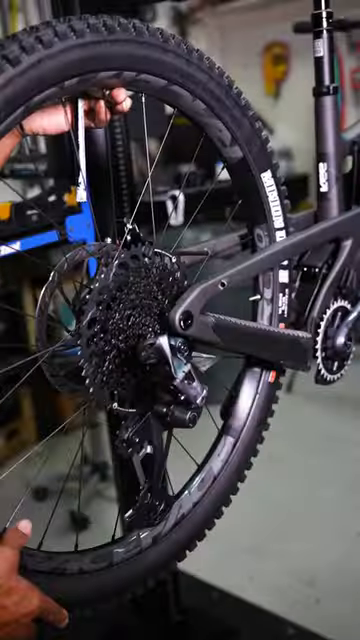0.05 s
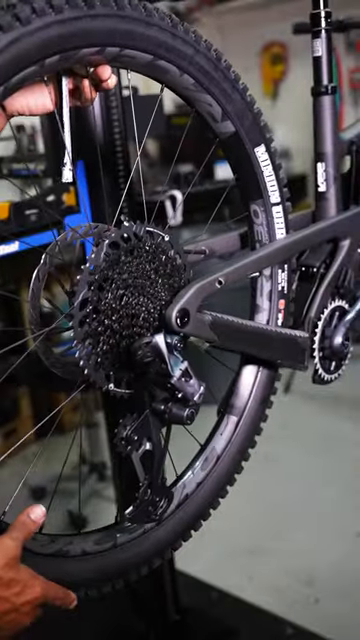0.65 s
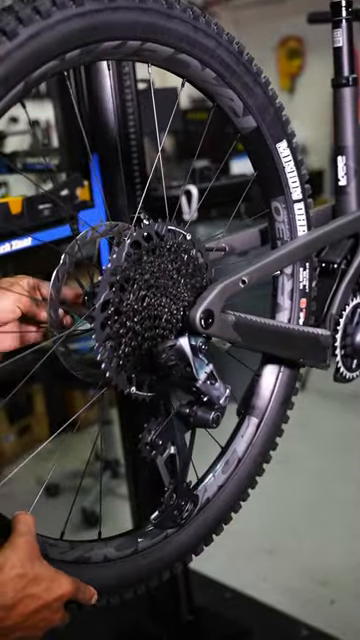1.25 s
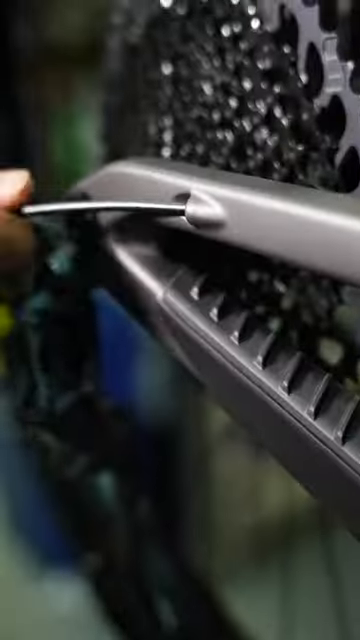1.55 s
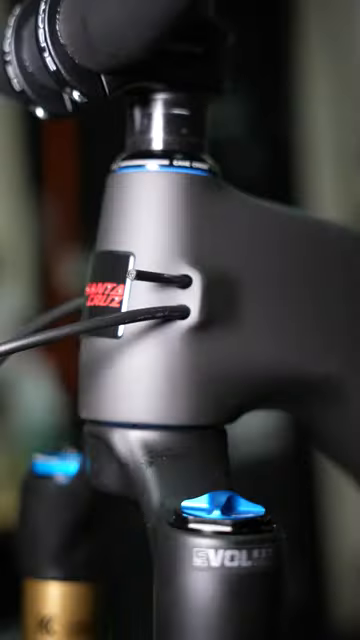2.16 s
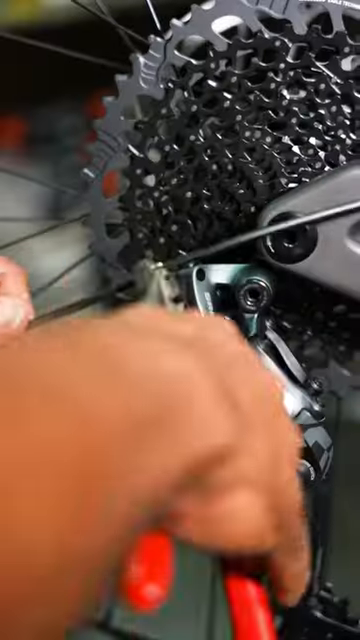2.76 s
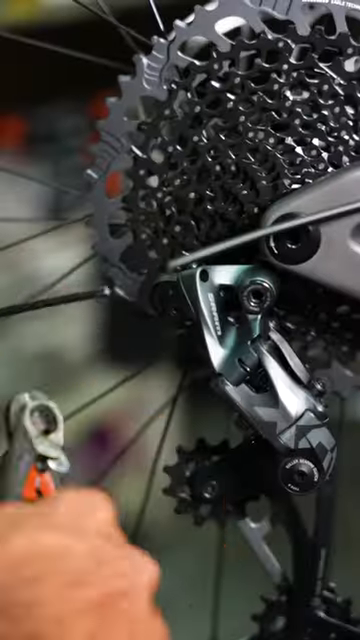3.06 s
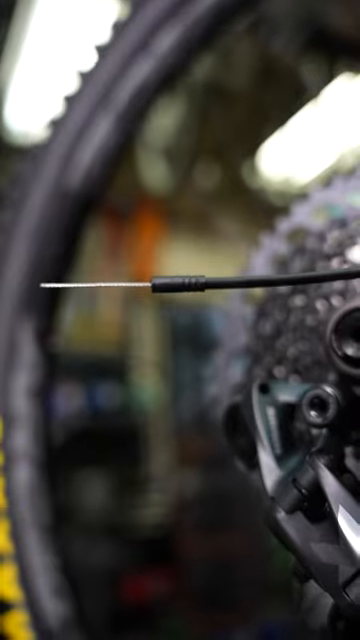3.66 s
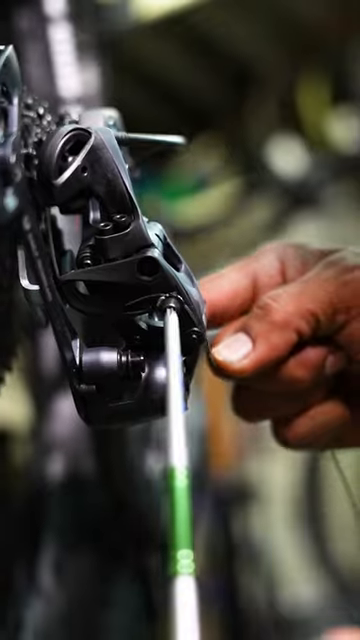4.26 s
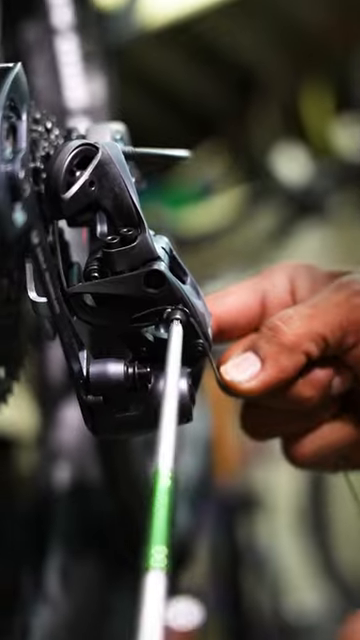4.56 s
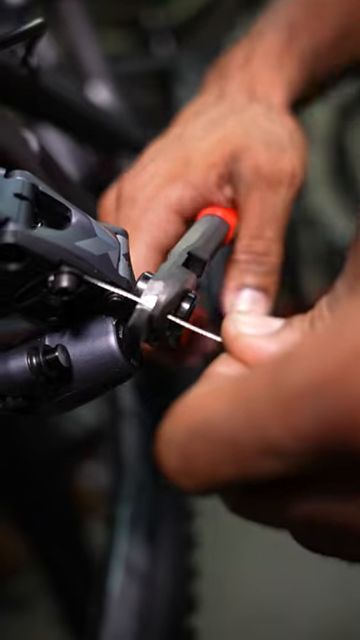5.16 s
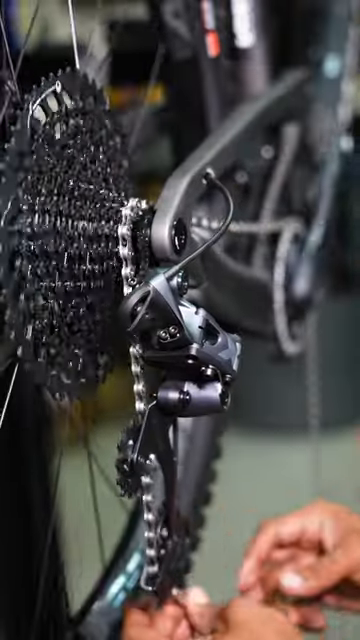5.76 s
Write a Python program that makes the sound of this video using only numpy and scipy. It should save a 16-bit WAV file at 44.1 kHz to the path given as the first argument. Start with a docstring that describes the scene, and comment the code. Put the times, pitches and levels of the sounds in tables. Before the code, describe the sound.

A bicycle wheel thuds into its frame, an axle zips and knocks home, then cutters snap twice through cable in a quiet workshop.

```python
"""A tyre drags briefly and a bicycle's rear wheel thuds into its frame, close by in a quiet workshop.
The axle slides in, its grooves zipping higher as it gains speed, and knocks home. Cable housing swishes
through the frame, a hex key scrapes, cutters snap through the housing, a tool ticks, the inner wire is
cut, and the chain starts to run. Impacts excite the damped modes of the parts and the room's echoes;
sliding friction is a train of tiny slips, filtered by the part that rubs."""
import sys
import numpy as np
from scipy import signal
from scipy.fft import rfft, irfft
from scipy.io import wavfile
from scipy.ndimage import uniform_filter1d

SR = 44100
rng = np.random.default_rng(int(sys.argv[2]) if len(sys.argv) > 2 else 0)


def unload_audio(sound):
    """Save the sound as a 16-bit wav file, at the path given as the first command line argument."""
    columns = np.transpose(np.atleast_2d(sound))
    # keep every value between -1 and 1, then stretch to whole-number steps
    steps = np.round(np.clip(columns, -1, 1) * 32767)
    wavfile.write(sys.argv[1], SR, steps.astype(np.int16))


N = 265041
TIME = np.arange(N) / SR
STRAND_MS = 1.8  # decay time of a strand's crack


def amp(db):
    """Amplitude ratio of a level in decibels."""
    return 10 ** (np.asarray(db) / 20)


def unit(x):
    """Normalisation to rms 1."""
    return x / np.sqrt(np.mean(x ** 2) + 1e-20)


def add(mix, s, sound):
    """Superposition: a sound joins the mix at time s."""
    part = mix[max(round(s * SR), 0):][:len(sound)]
    part += sound[:len(part)]


def flutter(samples, shape=N):
    """Random fluctuation: a moving average of white noise, rms 1."""
    return unit(uniform_filter1d(rng.standard_normal(shape), size=samples))


def envelope(strokes, attack_s, release_s, sag_db=0):
    """Amplitude envelope: each stroke rises 20 dB, sags steadily, then drops 20 dB per release time."""
    gain = np.zeros(N)
    for s, length_s, db in strokes:
        t = TIME - s
        ramps = np.maximum(1 - t / attack_s, 0) + np.maximum(t - length_s, 0) / release_s
        gain += (t >= 0) * amp(db - sag_db * np.clip(t / length_s, 0, 1) - 20 * np.minimum(ramps, 10))
    return gain


def colour(x, spectrum, tilt=0, size=4096):
    """Minimum-phase filtering to a spectral shape, tilted in dB per octave above 255 Hz."""
    octave = np.log2(abs(np.fft.fftfreq(size, 1 / SR)) + 1)
    hz, db = np.transpose(spectrum)
    db = np.interp(octave, np.log2(hz + 1), db) + tilt * np.maximum(octave - 8, 0)
    log_gain = np.log(amp(np.maximum(db - db.max(), -90)))
    taps = np.fft.ifft(np.exp(np.conj(signal.hilbert(log_gain)))).real
    return signal.fftconvolve(x, taps[:size // 2])


def resonate(x, hz, width_hz):
    """Resonance of gain 1 whose centre frequency may move."""
    carrier = np.exp(2j * np.pi * np.cumsum(hz * np.ones(N)) / SR)
    pole = np.exp(-np.pi * width_hz / SR)
    return 2 * (carrier * signal.lfilter([1 - pole], [1, -pole], x / carrier)).real


def glide(hz, width_hz):
    """Forced resonance: friction noise in a band that can follow a moving pitch, rms 1."""
    return unit(resonate(resonate(rng.standard_normal(N), hz, width_hz), hz, 2 * width_hz))


def sing(resonances):
    """Random excitation: friction keeps narrow resonances sounding, each flickering by itself."""
    return sum(amp(db) * unit(resonate(resonate(rng.standard_normal(N), hz, width), hz, width))
               for hz, width, db in resonances)


def body(x, share, length_s=.014, count=10):
    """Comb filtering: waves reflected to and fro inside a part give it many close resonances."""
    taps = np.zeros(int(length_s * SR))
    echoes = rng.choice([-1, 1], count) * share / np.sqrt(count)
    taps[rng.integers(len(taps) // 5, len(taps), count)] = echoes
    taps[0] = 1
    return signal.fftconvolve(x, taps / np.linalg.norm(taps))[:N]


def room(t60, build_s=0.0038, fade_s=.31, treble_hz=10000, treble_life=0.92):
    """Reverberation of energy 1: uneven early echoes merge into a tail whose treble dies sooner."""
    t = np.arange(SR * 3 // 5) / SR
    echoes = rng.standard_normal(len(t)) * amp(4.4 * rng.standard_normal(len(t)) * np.exp(-t / 0.066))
    dull = signal.sosfiltfilt(signal.butter(2, treble_hz, fs=SR, output="sos"), echoes)
    tail = dull * amp(-60 * t / t60) + (echoes - dull) * amp(-60 * t / (t60 * treble_life))
    tail *= (1 - np.exp(-(t / build_s) ** 2)) * np.exp(-(t / fade_s) ** 4)
    return tail / np.linalg.norm(tail)


def contact(decay_ms, passes=4):
    """Broadband excitation: a quickly dying burst of tiny impacts with a nearly flat spectrum."""
    fade = np.exp(-np.arange(int(decay_ms * SR / 150) + 16) * 1000 / SR / decay_ms)
    burst = rng.standard_normal(len(fade)) * fade
    for _ in range(passes):
        flat = unit(irfft(np.exp(1j * np.angle(rfft(burst))), len(fade)))
        burst = np.clip(flat * np.sqrt(np.mean(fade ** 2)), -2 * fade, 2 * fade)
    return burst


def struck(blows, direct, reverberant, room_db, t60, fade_s, build_s=0.0068, bright_db=0, soften_db=0):
    """Impact: a direct crack and its reverberant tail; soften_db makes longer contacts duller."""
    cracks, tails = np.zeros((2, N))
    for s, db, decay_ms in blows:
        decay_ms = max(decay_ms, .2)
        tilt = bright_db - soften_db * np.log2(decay_ms)  # dB per octave
        strength = amp(db) * np.sqrt(decay_ms * SR / 2000)
        crack = colour(contact(decay_ms), direct, tilt)
        tail = colour(room(t60, build_s, fade_s), reverberant, tilt / 2)
        add(cracks, s, strength * crack / np.linalg.norm(crack))
        add(tails, s, strength * amp(room_db) * tail / np.linalg.norm(tail))
    return cracks + body(tails, share=0.55)


def ring(s, modes, db, rise_s, blur_hz, length_s=0.56):
    """Free vibration: struck modes decay, each wavering as eight echo paths interfere."""
    t, out = np.arange(0, length_s, 1 / SR), np.zeros(N)
    for hz, level_db, t60 in modes:
        path_hz = hz + blur_hz * rng.uniform(-1, 1, (8, 1))
        paths = np.cos(2 * np.pi * (path_hz * t + rng.random((8, 1)))).sum(0)
        fade = amp(-60 * t / t60) * (1 - np.exp(-t / rise_s)) * np.cos(np.pi / 2 * t / t[-1]) ** 2
        add(out, s, amp(db + level_db) * unit(paths * fade) * np.sqrt(np.mean(fade ** 2) / 2))
    return out


def rub(pressure, spectrum, grain_db, wet):
    """Sliding friction: a dense train of uneven slips, scaled by the pressure of the stroke."""
    slips = rng.standard_normal(N) * amp(grain_db * flutter(40))
    direct = unit(colour(slips, spectrum)[:N]) * pressure
    return direct + wet * signal.fftconvolve(direct, room(t60=0.27))[:N]


def air():
    """Noise floor: steady room noise, three low swells and the pure tones of electric hum."""
    # Noise spectra and hum lines (frequency [Hz], relative level [dB])
    floor_spectrum = [(15, -31.5), (25, -6.5), (117, -2.5), (149, -5), (195, -6.5), (373, -11), (560, -12),
                      (818, -17.5), (1890, -19), (5880, -36.5), (16000, -58)]
    swell_spectrum = [(50, -8.5), (170, 1), (330, -4.5), (700, -16.5), (3000, -24.5), (12000, -55)]
    hum_lines = [(119.5, -79.5), (177.6, -75), (403.7, -83.5), (549, -82), (919.5, -84), (1470, -90),
                 (3273, -90)]
    # Swells (start [s], length [s], level [dB])
    swell_spans = [(1.55, 0.397, -67), (3.45, 0.669, -68.5), (5.75, 0.3, -68)]
    hum = sum(amp(db) * np.sqrt(2) * np.sin(2 * np.pi * (hz * TIME + rng.random()))
              for hz, db in hum_lines)
    swells = unit(colour(rng.standard_normal(N), swell_spectrum)[:N])
    swells *= envelope(swell_spans, attack_s=0.011, release_s=.12)
    floor = unit(colour(rng.standard_normal(N), floor_spectrum)[:N])
    return amp(-70) * floor + swells + amp(-5) * hum


def chain():
    """Forced vibration: rollers fizz and the sprockets ring faintly, louder as the chain speeds up."""
    # The chain's run (start [s], length [s], relative level [dB])
    run = [(5.749, .26, -46.5)]
    # Roller noise (frequency [Hz], level [dB])
    spectrum = [(240, -34), (400, -12), (1160, -18), (2250, -4), (2550, -13), (2800, -10.5), (3580, -10.5),
                (5870, -0.5), (9920, -2.5), (16000, -3.5)]
    # Sprocket resonances (frequency [Hz], bandwidth [Hz], level [dB])
    resonances = [(2235, 180, 0), (2783, 71, -5.5), (4170, 250, -4), (5940, 230, -3)]
    pressure = envelope(run, attack_s=0.0067, release_s=.05, sag_db=-4.5)
    rollers = rub(pressure, spectrum, grain_db=3, wet=0.11)
    sprockets = sing(resonances) * envelope(run, attack_s=0.0208, release_s=.05, sag_db=-8.5)
    return amp(-0.9) * rollers + amp(-16.5) * sprockets


def hex_key():
    """Impact and friction: a hex key slips into the shifter's bolt, rings, scrapes and turns."""
    # Scrapes (time [s], level [dB], decay [ms])
    scrapes = [(2.202, -72, 14), (2.386, -66.5, 6), (2.515, -70.5, 16)]
    # Turns (start [s], length [s], level [dB])
    turns = [(2.34, 0.075, -70), (2.53, 0.15, -75)]
    # Their spectra (frequency [Hz], level [dB])
    scrape_spectrum = [(500, -10), (1870, -3.5), (3500, -1), (5500, -10), (6960, -18), (8800, -9),
                       (12000, -26), (15600, -55)]
    turn_spectrum = [(300, -25), (430, -1), (640, 2), (950, -6), (1200, -17), (3200, -19), (4500, -19),
                     (7000, -35)]
    # Modes of the key (frequency [Hz], level [dB], t60 [s])
    modes = [(1900, 3, 0.178), (3000, 0, 0.1505), (4300, -7, 0.1)]
    key = struck(scrapes, scrape_spectrum, scrape_spectrum, room_db=-3, t60=0.23, fade_s=.1)
    key += ring(2.202, modes, db=-64.5, rise_s=0.002, blur_hz=450, length_s=0.1505)
    return key + rub(envelope(turns, attack_s=0.018, release_s=0.053), turn_spectrum, grain_db=3, wet=.1)


def adjusting():
    """Light impacts: a tool ticks brightly on the derailleur's screws, and a lever knocks softly."""
    # Contacts (time [s], level [dB], decay [ms])
    tool_ticks = [(4.1838, -29, 1.74), (4.2129, -27, 1.14), (4.859, -59.5, 3.8)]
    lever_knocks = [(4.76, -51.5, 13.2)]
    # Their spectra (frequency [Hz], level [dB])
    tool_direct = [(880, -56), (1500, -21.5), (2540, -0.5), (3450, -23.5), (4370, 0.5), (8400, 1.5),
                   (16000, 0)]
    tool_reverb = [(880, -36.5), (1500, -5.5), (2460, -2), (3550, -10), (4420, -1), (13800, -9),
                   (16000, 0.5)]
    lever_spectrum = [(110, -40), (180, -28), (280, 4), (337, -46), (547, -17.5), (611, -22), (1170, -3.5),
                      (1520, -14), (1570, -33), (2500, -29), (4000, -100)]
    ticks = struck(tool_ticks, tool_direct, tool_reverb, room_db=-13, t60=0.18, fade_s=0.087,
                   bright_db=2, soften_db=0.5)
    return ticks + struck(lever_knocks, lever_spectrum, lever_spectrum, room_db=0, t60=0.2, fade_s=0.098)


def cables():
    """Friction in a tube: housing swishes in and taps out of its port; the wire clicks past the cap."""
    # Slides (start [s], length [s], level [dB])
    feed_in = [(1.549, 0.13, -37.5)]
    feed_out = [(1.908, 0.091, -44)]
    wire_slides = [(3.608, 0.0877, -65), (3.908, 0.0712, -63)]
    # Contacts of the housing (time [s], level [dB], decay [ms])
    feed_catches = [(1.546, -45, 2.1), (1.576, -30, 5), (1.912, -54, 6.6)]
    port_taps = [(1.981, -43, 7.37), (1.9848, -25.5, 1.11), (1.999, -26, 1.95), (2.052, -43.5, 2.6)]
    # Spectra of the slides and contacts (frequency [Hz], level [dB])
    in_spectrum = [(530, -61), (900, -24), (1410, -26), (1490, -22), (2070, 1.5), (2730, 2.5), (3770, -0.5),
                   (4800, 1), (6480, -1), (8250, -7.5), (13500, -12), (16000, -18.5)]
    out_spectrum = [(530, -63), (900, -19), (1100, -25), (2270, -5.5), (3500, -3.5), (9310, -13.5),
                    (16000, -33.5)]
    wire_spectrum = [(650, -41), (1100, -5), (1420, -13), (1830, 0), (3360, -15), (4920, -7), (6440, -20),
                     (13000, -32)]
    port_spectrum = [(180, -54), (300, -18), (360, -10), (701, -11), (1120, -15), (1230, -5), (1810, -8.5),
                     (2100, 7.5), (2520, -13.5), (3350, -7), (5340, -16), (7570, -16), (16000, -58.5)]
    # Modes of the frame's port and the housing's end cap (frequency [Hz], level [dB], t60 [s])
    port_modes = [(1279, -2.5, 0.16), (2086, -2, 0.125), (3380, 5, 0.087), (7400, -8, 0.12)]
    cap_modes = [(1790, 0, 0.11)]
    push = envelope(feed_in, attack_s=0.02, release_s=0.035, sag_db=8)
    pull = envelope(feed_out, attack_s=0.03, release_s=0.0552, sag_db=0.5)
    feed = rub(push, in_spectrum, grain_db=1.5, wet=0.0764)
    feed += rub(pull, out_spectrum, grain_db=0, wet=.15)
    catches = struck(feed_catches, in_spectrum, in_spectrum, room_db=-1.5, t60=0.29, fade_s=.1,
                     bright_db=8, soften_db=4)
    threading = envelope(wire_slides, attack_s=.013, release_s=0.048, sag_db=1)
    wire = rub(threading, wire_spectrum, grain_db=0, wet=0.18)
    cap = ring(3.917, cap_modes, db=-50.5, rise_s=0.00083, blur_hz=90.5)
    taps = struck(port_taps, port_spectrum, port_spectrum, room_db=-4, t60=0.191, fade_s=0.099,
                  bright_db=7.5, soften_db=4)
    swish = body(feed, share=0.28)
    port = ring(1.999, port_modes, db=-40, rise_s=0.00085, blur_hz=69.5)
    return swish + catches + wire + cap + taps + port


def wheel():
    """Friction, then impact: the tyre drags, the hub drops in, and the wheel rings and rocks twice."""
    # Slides (start [s], length [s], level [dB])
    tyre_drag = [(0, 0.047, -43.5)]
    hub_seating = [(.25, .08, -57)]
    dropout_graze = [(.303, 0.01505, -36.5)]
    # Impacts (time [s], level [dB], decay [ms])
    drop_blows = [(.3038, -34.5, 4.1), (.318, -28.5, 23), (.3312, -18.5, 6.1), (.3342, -4.5, 3.5),
                  (.3455, -7, 2.6), (.3475, -8, 3.7), (.3715, -20, 6.7), (.402, -29, .4),
                  (.4595, -33.5, 0.39), (.5285, -40.5, 0.84)]
    dull_bumps = [(.303, -39, 15), (.443, -30.5, 15), (.679, -45, 4.34), (.697, -45.5, 18),
                  (5.788, -55, 7.8)]  # four as the wheel settles, one as the chain starts to run
    # Spectra of the slides and impacts (frequency [Hz], level [dB])
    drag_spectrum = [(59, -29), (100, -13), (243, -14.5), (400, 4.5), (576, -15), (686, -23.5),
                     (1400, -27.5), (1740, -13.5), (2180, -38), (3250, -48)]
    seating_spectrum = [(290, -45), (500, -15), (839, -0.5), (1040, -20), (1450, -8), (2240, -30),
                        (5740, -22.5), (7000, -45)]
    drop_direct = [(29, -39), (60, -14), (155, -6.5), (507, -14), (646, -7.5), (1020, -17), (1300, -5),
                   (1540, -13.5), (1700, 0), (2210, -15), (2620, 1), (3100, -16), (4350, 2.5), (4900, -18),
                   (16000, -41)]
    drop_reverb = [(24, -49), (40, -24), (185, -6.5), (412, -7), (542, -9.5), (680, -6), (831, -12),
                   (942, -7.5), (1150, -13), (1340, -9.5), (2050, -5.5), (3060, -11.5), (4460, -15.5),
                   (11800, -36.5), (16000, -42)]
    bump_spectrum = [(71, -53), (120, -23.5), (234, -32), (314, -3), (418, 4), (510, -19), (637, -9.5),
                     (731, -22), (1500, -51.5), (3300, -120)]
    # Rocking against the frame (time [s], level [dB], tilt about 400 Hz [dB/octave], length [s])
    rocks = [(0.443, -30, 2, 0.27), (0.68, -46.5, -5, 0.17)]
    # Modes of the wheel (frequency [Hz], level [dB], t60 [s])
    rim_modes = [(85.8, -4.5, 0.11), (167.15, -4, 0.29), (205, -1, .16), (1354, -2, .2), (1793.2, -4.5, .2),
                 (2676, -2, 0.29), (4470, 1, .17)]
    rock_modes = [(164.5, -22.5, 0.61), (339.4, 2.5, 0.29), (394.4, 3.5, 0.19), (431.6, -3.5, 0.73),
                  (620, -1, 0.18), (838, -2.5, 0.16)]
    tyre_pressure = envelope(tyre_drag, attack_s=0.00065, release_s=0.0049, sag_db=7)
    drag = rub(tyre_pressure, drag_spectrum, grain_db=0, wet=0.045)
    hub_pressure = envelope(hub_seating, attack_s=.002, release_s=.01, sag_db=-6.5)
    seating = rub(hub_pressure, seating_spectrum, grain_db=1.5, wet=.1)
    drop = struck(drop_blows, drop_direct, drop_reverb, room_db=-2, t60=0.46, fade_s=0.25,
                  build_s=0.0034, bright_db=3.5, soften_db=2)
    rim = ring(.333, rim_modes, db=-19, rise_s=.003, blur_hz=8)
    bumps = struck(dull_bumps, bump_spectrum, bump_spectrum, room_db=-1, t60=0.29, fade_s=0.23,
                   bright_db=10.5, soften_db=2.5)
    for s, db, tilt, length_s in rocks:
        modes = [(hz, level_db + tilt * np.log2(hz / 400), t60) for hz, level_db, t60 in rock_modes]
        bumps += ring(s, modes, db, rise_s=0.0051, blur_hz=4.8, length_s=length_s)
    graze = glide(4707, width_hz=1306)
    graze *= envelope(dropout_graze, attack_s=0.0031, release_s=.03, sag_db=6.5)
    return drag + seating + graze + drop + rim + bumps


def grooves(pitch, jitter_hz=224, burst_db=2.5, octave_db=-8):
    """Periodic excitation: grooves pass at an unsteady rate, sounding a tone and its octave in bursts."""
    # Noise bands from uneven grooves (multiple of the pitch, bandwidth [Hz], level [dB])
    bands = [(.72, 594, -9.5), (1.4, 903, -7), (2.2, 3002, -10)]
    phase = 2 * np.pi * np.cumsum(pitch + jitter_hz * flutter(24)) / SR
    bursts = amp(burst_db * flutter(200, (2, N)))
    tone = unit(bursts[0] * np.cos(phase)) + amp(octave_db) * unit(bursts[1] * np.cos(2 * phase))
    return tone + sum(amp(db) * glide(ratio * pitch, width) for ratio, width, db in bands)


def axle_slide():
    """Stick-slip friction: the axle gains speed, and its zip sweeps up through the tube's resonances."""
    # Passage of the grooves (time [s], rate [Hz], relative level [dB])
    passage = [(.78, 520, -40), (.87, 1078, -32), (.93, 1400, -29.5), (.953, 1742, -23),
               (.975, 2199, -26.5), (.994, 2700, -20), (1.014, 3650, -26), (1.024, 3955, -18),
               (1.032, 4150, -22.5), (1.056, 4650, -23.5), (1.064, 4870, -20), (1.074, 5107, -24),
               (1.09, 5830, -21), (1.115, 6560, -24), (1.15, 8780, -32)]
    # The slide, and the hub's hollow sounding as it fills (start [s], length [s], level [dB])
    strokes = [(.777, .07, -61.5), (.85, 0.16, -38.5)]
    hollow_span = [(.78, .17, -56.5)]
    # Spectra of the axle's tube and its friction (frequency [Hz], level [dB])
    tube_spectrum = [(600, -24), (1000, -23), (1300, -29), (1750, -13.5), (2300, -16.5), (2800, -11),
                     (3300, -17.5), (3950, -0.5), (4200, -9.5), (4500, -11.5), (4800, -4.5), (5300, -14),
                     (6300, -7.5), (6900, -22), (7900, -12.5), (9900, -19), (10700, -13), (13000, -17.5),
                     (16000, -32.5)]
    slide_spectrum = [(470, -51.5), (800, -21.5), (1290, -28), (1780, -9), (2840, 1), (3260, -12),
                      (4180, 3.5), (6300, -3), (6900, -10.5), (11500, -23), (13000, -55)]
    # Squeaking resonances (frequency [Hz], bandwidth [Hz], level [dB])
    squeaks = [(2280, 108, 0), (2780, 130, 0), (4000, 170, -3)]
    times, hz, bite_db = np.transpose(passage)
    pitch = np.interp(TIME, times, hz)
    moving = (TIME >= times[0]) * (TIME <= times[-1])
    bite = amp(np.interp(TIME, times, bite_db)) * moving
    grip = amp(2.2 * flutter(60))
    zipping = colour(grooves(pitch) * grip * bite, tube_spectrum)[:N]
    zipping += amp(-7) * signal.fftconvolve(zipping, room(t60=.42))[:N]
    push = envelope(strokes, attack_s=0.013, release_s=0.1, sag_db=2.5) * moving
    slide = body(rub(push, slide_spectrum, grain_db=3.5, wet=0.22), share=0.62)
    slide += amp(-7) * sing(squeaks) * push
    hollow_hz = np.minimum(296 * (pitch / pitch[0]) ** 0.45, 480)  # rises with the axle's speed
    hollow = glide(hollow_hz, width_hz=100) * grip
    hollow *= envelope(hollow_span, attack_s=0.025, release_s=0.063)
    return zipping + slide + hollow


def axle_knock():
    """Impact excitation: the axle knocks home and rings in its modes."""
    # Impacts (time [s], level [dB], decay [ms])
    blows = [(.7775, -55.5, 4.1), (1.153, -22.5, 1.44), (1.1564, -3, 2.17), (1.1594, -12, 3.3),
             (1.1795, -12.5, 4.1), (1.1868, -4.5, 3.88)]
    # Their spectra (frequency [Hz], level [dB])
    direct = [(88, -67.5), (150, -31.5), (589, -11), (745, -12), (1360, -5), (1660, -6), (1790, 1.5),
              (1980, -8), (2920, -6.5), (5150, -16.5), (9630, -22.5), (10800, -20), (16000, -32.5)]
    reverberant = [(70, -70), (156, -22), (260, -27), (295, -17), (452, -8.5), (502, -12.5), (784, -15),
                   (910, -7), (1330, -3.5), (2040, -1), (4470, -9.5), (8280, -25), (9410, -23),
                   (16000, -41.5)]
    # Modes of the axle (frequency [Hz], level [dB], t60 [s])
    modes = [(1451, -1.5, .3), (1797, 2.5, 0.26), (2010, 1, 0.3), (2290, -1.5, 0.2), (6450, -13, 0.32),
             (8200, -14, 0.22), (9150, -13.5, 0.72), (10660, -7.5, 0.16)]
    knock = struck(blows, direct, reverberant, room_db=-1.14, t60=0.47, fade_s=0.208,
                   build_s=0.0012, bright_db=8.5, soften_db=5)
    knock += ring(1.187, modes[:4], db=-21.5, rise_s=.001, blur_hz=20, length_s=.16)
    return knock + ring(1.158, modes, db=-22, rise_s=0.0023, blur_hz=9, length_s=0.39)


def recoil():
    """Structure-borne sound: the cable, freed by each cut, shakes the frame or the derailleur."""
    # Low modes of the bicycle (frequency [Hz], level [dB], t60 [s])
    frame_modes = [(60.4, -3, .15), (86.04, 0, 0.13), (128, -9, .13), (218.94, -2.5, 0.14),
                   (284, -12.5, .2), (353, -10.5, 0.32)]
    derailleur_modes = [(52, -8, 0.48), (85.6, -2.5, 0.61), (151.4, -7, 0.65), (193.5, 2.5, 0.48),
                        (274, 7, 0.15), (451, -2, 0.4), (502, -8.5, .19), (633, -1, 0.22),
                        (845, -13.5, 0.33), (921, -15.5, .45)]
    squeeze = ring(2.966, frame_modes[:2], db=-24, rise_s=.004, blur_hz=7.3)
    frame = ring(2.986, frame_modes, db=-24, rise_s=0.004, blur_hz=7.3, length_s=0.15)
    return squeeze + frame + ring(5.32, derailleur_modes, db=-24, rise_s=0.027, blur_hz=9, length_s=0.52)


def housing_cut():
    """Fracture: strands crack in turn, exciting the steel sheath until it gives way with a ringing snap."""
    # Breaking strands (time [s], level [dB])
    strands = [(2.9637, -16.5), (2.9664, -13), (2.9753, -17.5), (2.9828, -13.5), (2.987, -7.5),
               (2.9895, -4), (2.9925, -14), (2.9944, 1), (2.9993, -13.5)]
    # Their spectra (frequency [Hz], level [dB])
    direct = [(350, -66.5), (600, -42.5), (944, -9.5), (1400, -14), (1780, -0.5), (2150, 3), (2470, -8),
              (2650, -7), (3160, -4.5), (4650, -13), (5870, -4.5), (7020, -22.5), (7940, -8.5), (9620, -9),
              (16000, -19.5)]
    reverberant = [(400, -44), (700, -30.5), (1100, -21), (1400, -24), (1750, -2.5), (2220, -3),
                   (2600, -20), (4200, -14), (4950, -5.5), (5850, -5.5), (6300, -17), (7900, -18),
                   (9100, -3.5), (9900, -17), (12200, -27.5), (16000, -35)]
    # Modes of the sheath and of the final snap (frequency [Hz], level [dB], t60 [s])
    sheath_modes = [(1026, -12, .04), (3260, 1, 0.028), (5680, -6, .015), (9450, -7, 0.025)]
    snap_modes = [(1814, 0.5, 0.31), (2018, 0, 0.4), (2207, -2, 0.42), (5006, -8, 0.44), (5230, -8, 0.44),
                  (5860, -5, 0.44), (5922, -6, 0.39), (8748, -8, 0.44), (8969, -4, 0.36), (9130, -4, 0.34)]
    cracks = [(s, db, STRAND_MS) for s, db in strands]
    cut = struck(cracks, direct, reverberant, room_db=-2.5, t60=0.52, fade_s=0.3,
                 build_s=.012, bright_db=-0.4)
    for s, _ in strands[:5]:
        cut += ring(s, sheath_modes, db=-19, rise_s=0.00025, blur_hz=160, length_s=.04)
    cut += ring(2.9944, snap_modes, db=-25, rise_s=0.0038, blur_hz=6.7, length_s=.5)
    return cut + ring(2.9944, snap_modes, db=-25.5, rise_s=0.0038, blur_hz=150, length_s=.5)


def wire_cut():
    """Fracture and impact: the jaws bite, crack the strands, slam shut and ring in clustered modes."""
    # First bite (time [s], level [dB], decay [ms])
    first_bite = [(5.2778, -24.5, 0.97)]
    # Breaking strands (time [s], level [dB])
    strands = [(5.3019, -35), (5.306, -14.5), (5.3073, -6.5), (5.3088, -6), (5.3154, 0), (5.3208, -19),
               (5.3245, -10.5)]
    # Spectra of both (frequency [Hz], level [dB])
    direct = [(290, -54), (500, -28), (1080, -8), (1740, -15.5), (2070, -13), (2500, -20.5), (3340, -4),
              (4210, -10), (4660, 1), (5390, -14), (5880, 0), (7420, -19), (8830, -4.5), (12900, -16),
              (16000, -18)]
    reverberant = [(410, -15), (700, -12.5), (830, -9), (1040, -13), (1420, -18), (2030, -1.5), (2700, -24),
                   (3320, -14), (3640, -15.5), (4920, -4), (5920, -11), (6920, -20.5), (9350, -8.5),
                   (11700, -32.5), (16000, -37.5)]
    # Long- and short-lived modes of the jaws (frequency [Hz], level [dB], t60 [s])
    long_modes = [(1898, 0, 0.38), (2125, -3.5, .44), (3391, -3.5, 0.2), (4700, -2, 0.48), (4759, 0.5, 0.5),
                  (5010, -3.5, 0.42), (5430, -6, 0.41), (5800, -4.5, 0.46), (6030, -5.5, 0.54),
                  (8800, -3.5, 0.44), (9250, -3, 0.42)]
    short_modes = [(3360, -2.5, 0.04), (5890, 3.5, 0.026)]
    cracks = [(s, db, STRAND_MS) for s, db in strands]
    cut = struck(cracks, direct, reverberant, room_db=-3.5, t60=0.5, fade_s=0.29,
                 build_s=0.0089, bright_db=0.5)
    cut += ring(5.316, long_modes, db=-28.5, rise_s=.005, blur_hz=8)
    cut += ring(5.316, long_modes, db=-27.5, rise_s=0.0059, blur_hz=220.3)
    cut += ring(5.3075, short_modes, db=-25.5, rise_s=.0003, blur_hz=120, length_s=.05)
    bite = struck(first_bite, direct, reverberant, room_db=-10.5, t60=0.53, fade_s=.33, bright_db=7)
    bite += ring(5.2778, short_modes, db=-36, rise_s=0.00029, blur_hz=120, length_s=0.02)
    return bite + cut


def scene():
    """Superposition of all the jobs and the room noise in one channel."""
    mounting = wheel() + axle_slide() + axle_knock()
    cabling = cables() + housing_cut() + wire_cut() + recoil()
    return (mounting + cabling + hex_key() + adjusting() + chain() + air())[None]


def record(dry):
    """Hard clipping of the strongest cracks, then a low-pass band limit."""
    lowpass = signal.firwin(301, 16100, window=("kaiser", 8), fs=SR)
    return signal.oaconvolve(np.clip(dry, -1, 1), lowpass[None], "same")


dry = scene()
out = record(dry)
unload_audio(out)
```